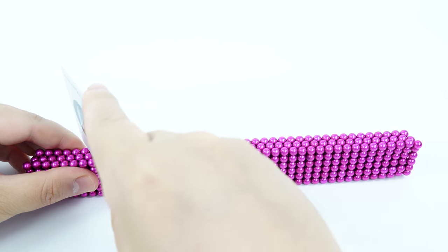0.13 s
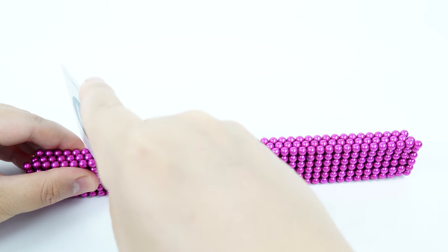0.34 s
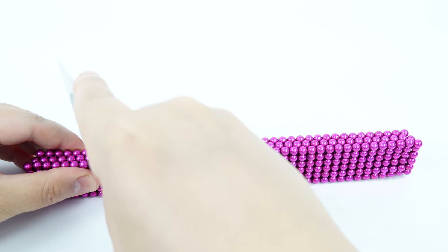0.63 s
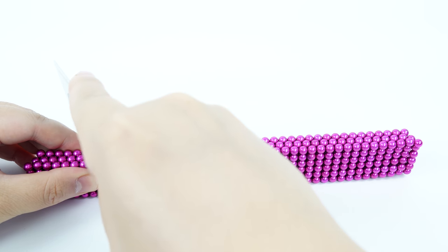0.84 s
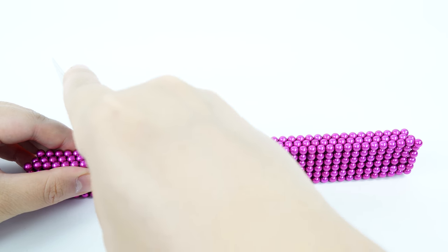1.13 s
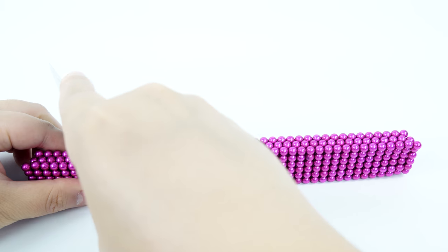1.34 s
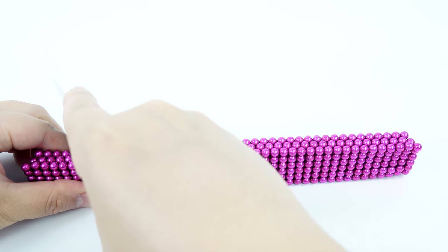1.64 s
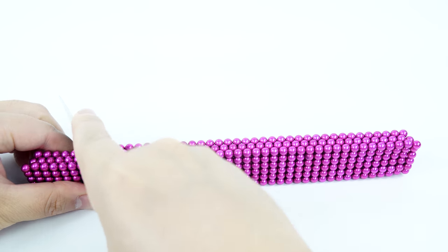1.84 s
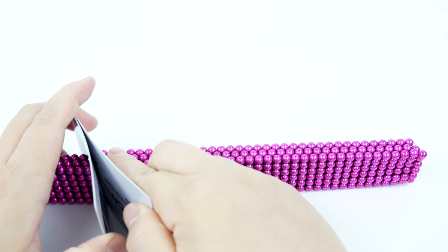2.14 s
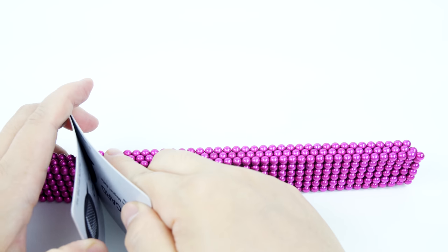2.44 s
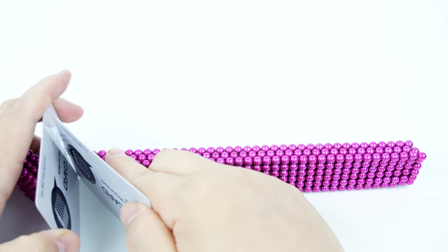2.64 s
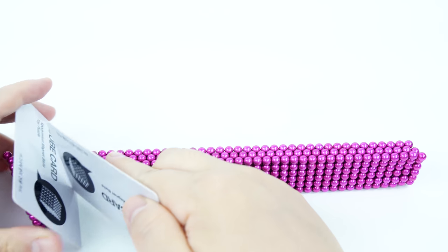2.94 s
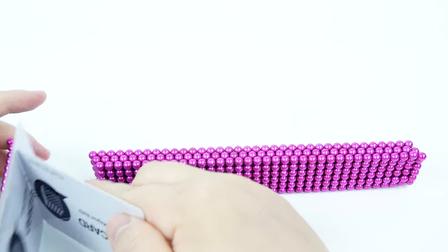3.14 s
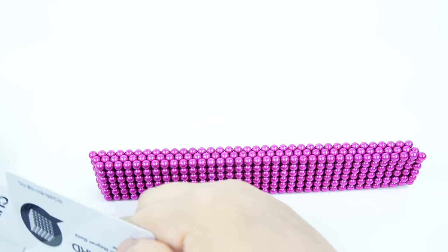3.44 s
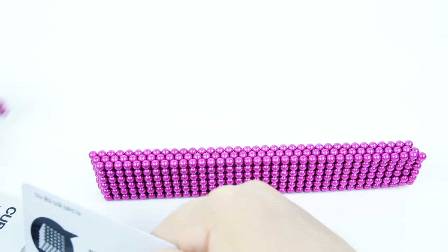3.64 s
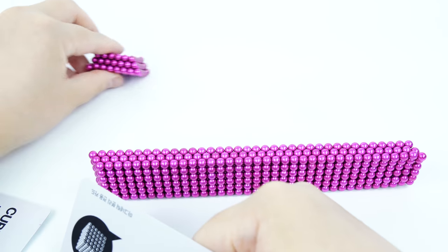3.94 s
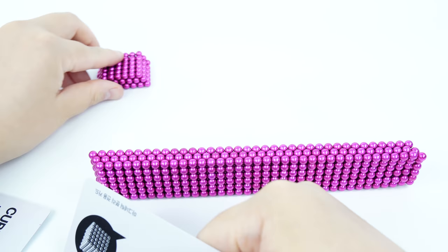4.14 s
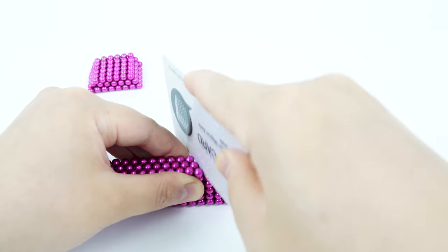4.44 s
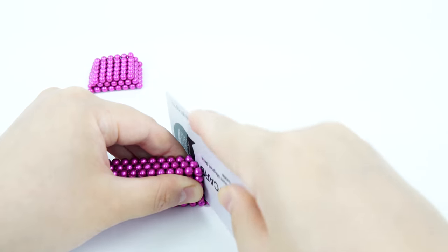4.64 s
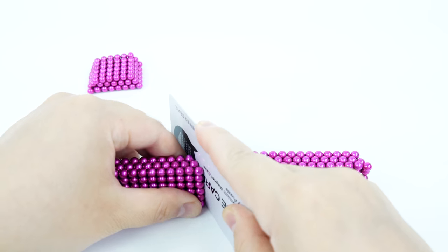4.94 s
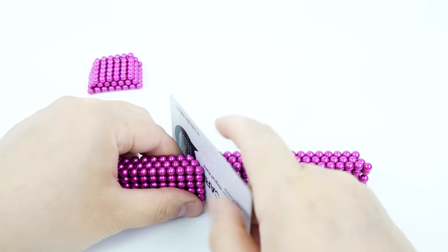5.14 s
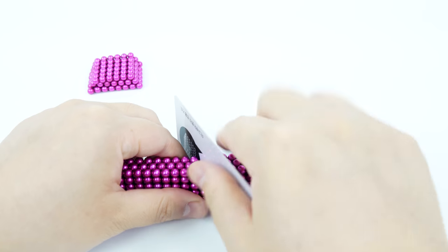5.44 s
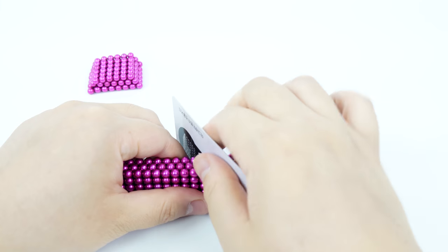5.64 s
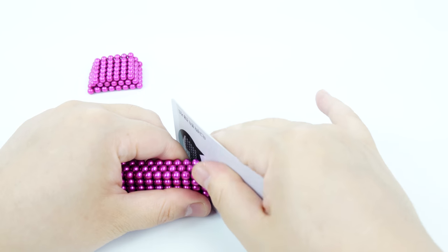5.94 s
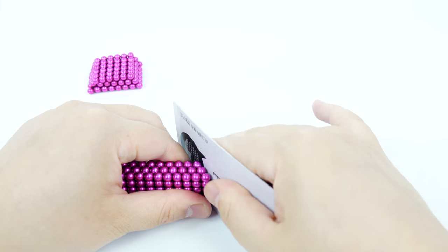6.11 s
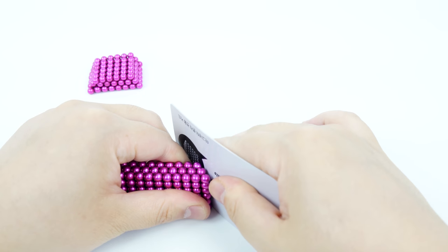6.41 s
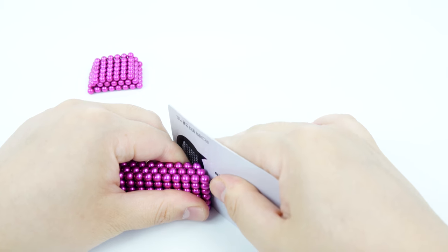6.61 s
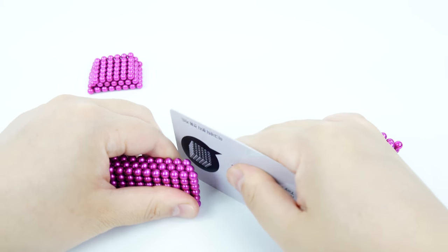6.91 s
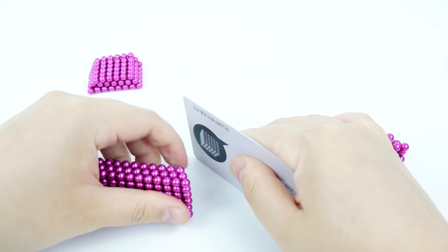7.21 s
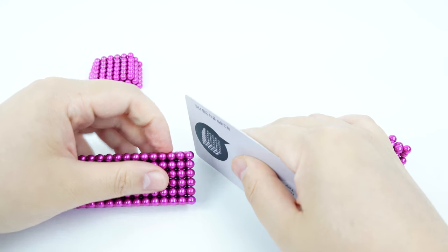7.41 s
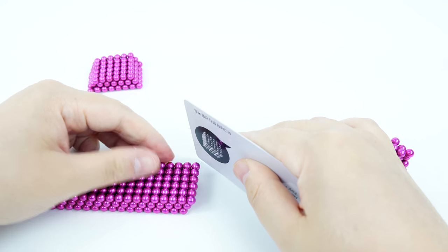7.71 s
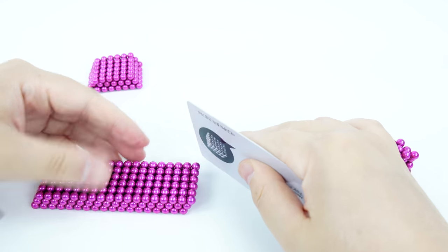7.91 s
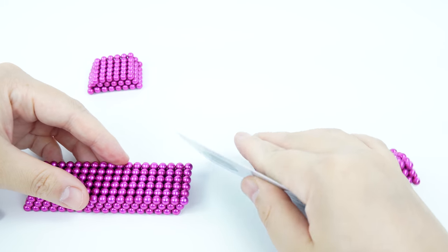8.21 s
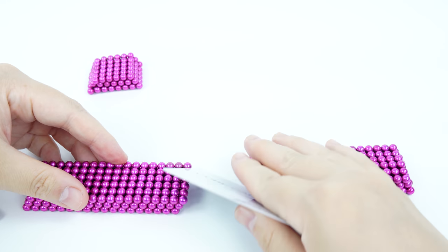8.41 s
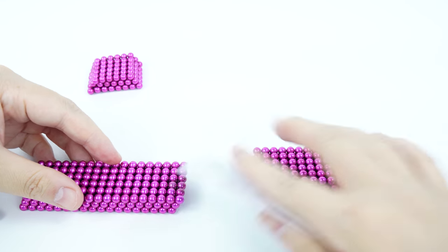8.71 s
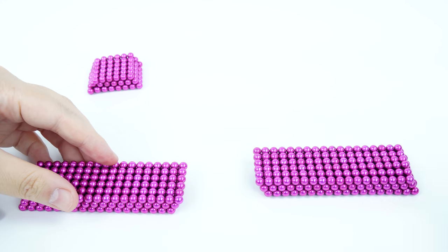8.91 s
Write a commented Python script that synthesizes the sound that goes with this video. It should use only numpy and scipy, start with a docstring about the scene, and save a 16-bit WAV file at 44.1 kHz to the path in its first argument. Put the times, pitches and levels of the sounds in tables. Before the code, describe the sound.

Small magnetic balls snap together in sharp clicks that knock a table, with soft rattling and a plastic card rustling between them.

```python
"""Small dry room, hollow table top: a slab of steel magnet balls is split with a plastic card and moved.
Balls snap together in short volleys of clicks that knock the table. Shoved by hand, the slab rattles
and rumbles over the wood; the card rustles over the balls and creaks between them.
Moving hands push air. Low ventilation hum and a faint hiss underneath."""
import sys
import numpy as np
from scipy import signal
from scipy.fft import rfft, irfft, next_fast_len
from scipy.io import wavfile

SR = 44100
rng = np.random.default_rng(int(sys.argv[2]) if len(sys.argv) > 2 else 0)


def master_out(mix):
    """Clip the mix to full scale and print it as 16-bit PCM to the path in sys.argv[1]."""
    frames = np.transpose(np.atleast_2d(mix))
    ceiling = np.clip(frames, -1, 1)
    pcm = np.round(ceiling * 32767).astype(np.int16)
    wavfile.write(sys.argv[1], SR, pcm)


N = 399546
CONTROL_HOP = 32  # samples

# table top modes, first two thump, the rest knock: freq_hz, level_db, t60_s
TABLE_MODES = [(54.6, -17, .15), (116, -1, 0.16), (221, -4.5, 0.081), (267.6, 0, 0.076), (330, -4, 0.048),
               (407, -2.5, 0.065), (464.3, -7, 0.11), (605, -1, 0.075), (681, -8.5, 0.17)]


def amp(db):
    """dB to gain."""
    return 10 ** (np.asarray(db) / 20)


def unit(x):
    """Scale to rms 1."""
    return x / np.sqrt(np.mean(x ** 2) + 1e-20)


def max_abs(x):
    """Peak magnitude."""
    return np.abs(x).max()


def along(points, hz):
    """Interpolate (freq_hz, value) points on a log axis."""
    f, v = np.transpose(points)
    return np.interp(np.log(hz + 1), np.log(f + 1), v)


def filtered(x, response):
    """Apply a complex frequency response."""
    m = next_fast_len(len(x) + SR // 4)
    return irfft(rfft(x, m) * response(np.fft.rfftfreq(m, 1 / SR)), m)[:len(x)]


def peak(f, hz, width_hz):
    """Causal resonance, gain 1 at centre."""
    return 1j * f * width_hz / (hz * hz - f * f + 1j * f * width_hz)


def grit(per_s, spread_db):
    """Random contacts: sparse impulses of scattered size."""
    size = amp(spread_db * rng.exponential(size=N)) * rng.standard_normal(N)
    return size * (rng.random(N) < per_s / SR)


def swells(rows):
    """Gain curve per row: rounded rise, even decay; rise_s and fall_s each span 20 dB."""
    top_s, db, rise_s, fall_s = np.transpose(rows)[:4, :, None]
    late_s = np.arange(0, N, CONTROL_HOP) / SR - top_s
    drop_db = 20 * np.where(late_s < 0, (late_s / rise_s) ** 2, late_s / fall_s)
    return amp(db - np.minimum(drop_db, 180))


def per_sample(control):
    """Control rate to sample rate."""
    return np.interp(np.arange(N), CONTROL_HOP * np.arange(len(control)), control)


def envelope(rows):
    """Power sum of the swells."""
    return per_sample(np.linalg.norm(swells(rows), axis=0))


def gripped(x, rows, bands, log_span):
    """Swelling ring of the bands the grip leaves free: those near the power-weighted mean pitch of the swells."""
    power = swells(rows) ** 2
    pitch_hz = per_sample(np.exp(np.log(np.transpose(rows)[4]) @ power / power.sum(0)))
    gains = [0.056 + np.exp(-(np.log(pitch_hz / hz) / log_span) ** 2) for hz, _ in bands]
    ring = 0
    for gain, (hz, width_hz) in zip(gains, bands):
        band = lambda f: peak(f, hz, width_hz) * peak(f, hz, 3 * width_hz)
        ring += gain * unit(filtered(x, lambda f: band(f) / (1 + 1j * f / (1.8 * hz)) ** 2))
    return envelope(rows) * ring / np.linalg.norm(gains, axis=0)


def room(x, wet_db):
    """Direct sound plus a diffuse tail with frequency-dependent decay."""
    decay = [(100, 0.32), (500, 0.21), (2000, 0.24), (6000, 0.19), (10000, .14), (14000, 0.15)]  # freq_hz, t60_s
    hz, t, spectrum = signal.stft(rng.standard_normal(SR // 3), SR, nperseg=256)
    tail = signal.istft(spectrum * amp(-60 * t / along(decay, hz)[:, None]), SR, nperseg=256)[1]
    tail = np.pad(tail / np.linalg.norm(tail), (round(.002 * SR), 0))  # nearest surface under 1 m
    return x + amp(wet_db) * signal.fftconvolve(x, tail)[:len(x)]


def ventilation():
    """Steady low hum of shaped noise."""
    spectrum = [(21, -38.5), (35, -4), (43, -9.5), (123, 0), (190, -12.5), (216, -11), (294, -7.5),
                (410, -13), (478, -15), (819, -21.5), (1090, -25), (2590, -39.5), (16000, -63.5)]  # freq_hz, level_db
    return amp(-59) * unit(filtered(rng.standard_normal(N), lambda f: amp(along(spectrum, f))))


def hiss():
    """Faint hiss: jumps to each new level, then mostly fades; the loud segment at 7.67 s is a bright rattle of
    balls settling."""
    segments = [(0.0, -68.5, 28), (1.337, -71, 20), (2.07, -69.5, 18), (2.89, -76.5, 6.5), (3.361, -66, 28),
                (4.376, -74.5, 6.5), (4.54, -57, 51), (4.96, -87, 4.5), (7.67, -47.5, 121.5),
                (8.0, -90.5, -4), (8.69, -73.5, 2)]  # start_s, level_db, fade_db_per_s
    spectrum = [(1000, -11.5), (3500, -3), (6500, -4), (9500, -4.5), (12500, -8), (16000, -5)]  # freq_hz, level_db
    t, columns = np.arange(N) / SR, np.transpose(segments)
    start_s, db, fade_db_per_s = columns[:, np.maximum(np.searchsorted(columns[0], t) - 1, 0)]
    noise = unit(filtered(rng.standard_normal(N), lambda f: amp(along(spectrum, f))))
    return amp(db - fade_db_per_s * (t - start_s)) * noise


def steel_clicks(volley, hz, clack_db, edge_db):
    """Ball contacts: a click, a duller clack of the slab, a bright edge."""
    width_hz = 0.52 * hz
    click = lambda f: peak(f, hz, width_hz) * peak(f, hz, 2.7 * width_hz) / (1 + 1j * f / (4.1 * hz)) ** 2
    clack = lambda f: peak(f, 1050, 730) * peak(f, 940, 1400)
    edge = lambda f: peak(f, 7200, 5000) ** 2
    # walls blur the volley into one blow of equal energy
    impulse = np.linalg.norm(volley) * signal.unit_impulse(len(volley))
    parts = [(amp(db) / max_abs(filtered(impulse, colour)), colour)
             for db, colour in [(0, click), (clack_db, clack), (edge_db, edge)]]
    steel = lambda f: sum(gain * colour(f) for gain, colour in parts)
    blow = filtered(impulse, steel)
    reflections = room(blow, wet_db=3.5) - blow
    return 1.9 * filtered(volley, steel) + reflections


def table_response(f, modes):
    """Table top modes, width set by decay; the treble falls away steeply above 900 Hz."""
    ring = sum((-1) ** k * amp(db) * peak(f, hz, np.log(1000) / np.pi / t60_s)
               for k, (hz, db, t60_s) in enumerate(modes))
    return ring / (1 + 1j * f / 900) ** 3


def table_blow(push, landing, knock_db, thump_db):
    """Knock, deep thump and a short, broad wooden slap near 480 Hz as the slab lands."""
    knock = filtered(push, lambda f: table_response(f, TABLE_MODES[2:]))
    thump = filtered(push, lambda f: table_response(f, TABLE_MODES[:2]))
    slap = filtered(np.roll(push, landing), lambda f: peak(f, 480, 690) ** 2)
    wood = amp(knock_db) * (knock / max_abs(knock) + 1.1 * slap / max_abs(slap))
    return room(wood, wet_db=-5.5) + amp(thump_db) * thump / max_abs(thump)


def snaps():
    """Loose balls tick, the slab snaps shut or lands: contact volleys ring steel and table."""
    ticks = [(0.027, -50.5, 4940), (.59, -74, 4200), (2.317, -62.5, 4210), (2.5452, -45, 5470),
             (2.72, -64, 3500), (2.829, -57.5, 3200), (3.245, -34, 5140), (3.683, -56, 5500),
             (5.0384, -57.5, 6200), (8.413, -55, 2124), (8.4925, -50.5, 6470), (8.574, -38.5, 5450),
             (8.686, -31, 5240)]  # start_s, level_db, pitch_hz
    tick_shape = (-19.5, -24, -17, -16.5, .0015)  # clack_db, edge_db, knock_db, thump_db, volley_s
    # start_s, level_db, pitch_hz, then as tick_shape; clack to thump relative to the click
    slab_snaps = [(1.4199, -60.5, 1680, -16, -25, 2, 28.5, 0.0022),
                  (1.4331, -42.5, 2800, 12.5, 2, 9.5, 14.5, 0.0012),
                  (1.4674, -40.5, 2610, -22, 0, 0.5, 13, 0.0012),
                  (1.7934, -23.5, 2614, -9, -10.5, -9, 2, 0.0011),
                  (1.8054, -26.5, 2340, -4.5, -18.5, -7, 2.5, 0.0027),
                  (1.8101, -8.5, 5000, -15, -18, -12, -18, 0.001),
                  (1.8111, -18.5, 1900, -13.5, -29, -15.5, -18, 0.001),
                  (1.9217, -48.5, 2630, -5.5, 6, 13, 23, 0.00074),
                  (2.628, -45, 1900, -17.5, -22.5, 8, -1.5, 0.0022),
                  (3.168, -35.5, 1900, 1, -11, -7, -32, 0.0015),
                  (3.2088, -36, 2260, 1.5, 2, 1, -20, 0.0015),
                  (3.5587, -26, 5270, -23.5, -4, -37, -19, 0.0026),
                  (3.599, -45.5, 2140, -10, 8, -6, 1.5, 0.0016),
                  (3.9874, -17.5, 1810, 0, -23, -4.5, -19.5, 0.0008),
                  (4.1812, -7.5, 2340, -7.5, -28, -4.5, -12, 0.0012),
                  (4.5334, -44, 2150, 0.5, -19, 18, 12.5, 0.0018),
                  (4.5408, -40.5, 1710, 4.5, -24.5, 19, 14.5, 0.0017),
                  (4.5703, -25, 1800, -8.5, -18.5, 10, -6, 0.0021),
                  (4.579, -14, 3086, -21, -31.5, -4, -2, 0.0043),
                  (4.709, -33.5, 1630, -7, -33.5, -14.5, 0.5, 0.0028),
                  (4.7943, -15, 1833, -23.5, -21, -23.5, -10, 0.0028),
                  (5.2397, -68.5, 1610, 13.5, -28, 16.5, 20, 0.00099),
                  (6.3997, -62, 1680, 4.5, -23, 16, 1, 0.0018),
                  (7.6529, -14.5, 2108, -4.5, -17.5, -3, -7, 0.0013),
                  (7.661, -3, 2900, -5.5, -26.5, -7, -13, 0.00092),
                  (7.673, -9.5, 1600, -8.5, -29, -24.5, -3.5, 0.0026)]
    out, t = np.zeros(N + SR), np.arange(SR // 2) / SR
    events = slab_snaps + [tick + tick_shape for tick in ticks]
    for start_s, db, hz, clack_db, edge_db, knock_db, thump_db, volley_s in events:
        swell = (.4 + t / 0.00051) * np.exp(-t / volley_s)
        volley = rng.standard_normal(len(t)) * (rng.random(len(t)) < .15) * swell
        landing = round(volley_s * SR)
        volley[0] = -2.7  # clear first contact
        volley[landing] = -3.0  # most balls land together
        push = -np.exp(-t / 0.00027) + 0.2 * volley  # softer, longer force on the table
        steel = steel_clicks(volley, hz, clack_db, edge_db)
        wood = table_blow(push, landing, knock_db, thump_db)
        out[round(start_s * SR):][:len(t)] += amp(db) * (steel + wood)
    return out[:N]


def hand_air():
    """Moving hands push air at the microphone."""
    puffs = [(1.46, -54.5, .03, .08), (1.83, -41, .03, .08), (3.39, -36.5, .13, .09),
             (3.613, -45.5, .05, .08), (4.19, -40, .02, .1)]  # top_s, level_db, rise_s, fall_s
    return envelope(puffs) * unit(filtered(rng.standard_normal(N), lambda f: peak(f, 35, 31) ** 2))


def slab_rattle(bumps):
    """Balls jostle within the slab."""
    jostles = [(2.625, -48, 0.025, 0.079, 1150), (3.01, -70.5, 0.025, 0.071, 1414),
               (3.12, -59, 0.041, 0.13, 1450), (3.172, -44, 0.0055, 0.19, 2060),
               (3.585, -52.5, 0.047, 0.085, 2230), (4.039, -49, 0.024, 0.038, 1608),
               (4.165, -60, 0.0093, 0.031, 1350), (4.25, -50.5, .03, 0.11, 2410),
               (4.581, -27, 0.026, .04, 1218), (4.806, -28.5, 0.018, 0.045, 2130),
               (6.832, -34, 0.034, 0.084, 1435), (8.021, -65, 0.079, .12, 1350),
               (8.16, -62.5, 0.086, 0.064, 1370), (8.429, -67, 0.031, 0.18, 2040)]  # top_s, level_db, rise_s, fall_s, pitch_hz
    slab_bands = [(1120, 170), (1450, 780), (1750, 490), (2150, 470), (2900, 240)]  # freq_hz, width_hz
    return gripped(bumps, jostles, slab_bands, log_span=0.25)


def card_rustle(bumps):
    """The card slides over the balls: bumps plus fine friction."""
    rubs = [(2.624, -64.5, 0.023, 0.085), (3.11, -75, 0.07, 0.066), (3.198, -44.5, 0.018, 0.074),
            (3.529, -60.5, 0.23, .15), (4.165, -73, 0.012, 0.014), (4.545, -53.5, .01, .02),
            (4.603, -53, 0.024, 0.065), (6.83, -50, 0.033, 0.085), (8.501, -78, 0.16, 0.1),
            (8.8, -72, 0.055, .8), (9.0, -68, 0.17, .06)]  # top_s, level_db, rise_s, fall_s
    spectrum = [(2000, -26), (4400, -10.5), (5200, -4.5), (6500, -5.5), (7200, -3), (8000, -11),
                (9600, -16.5), (10400, -15.5), (16000, -32)]  # freq_hz, level_db
    friction = .4 * bumps + grit(per_s=7000, spread_db=.8)
    return envelope(rubs) * unit(filtered(friction, lambda f: amp(along(spectrum, f))))


def slab_rumble():
    """The slab bumps over the table ball by ball; the hand damps the wood slightly."""
    shoves = [(2.698, -36.5, 0.066, 0.067, 242), (3.197, -35.5, 0.031, 0.18, 238),
              (3.353, -32.5, 0.063, 0.09, 254), (3.606, -38, 0.083, 0.038, 225),
              (4.05, -33.5, 0.034, 0.087, 322), (4.165, -32, 0.045, 0.036, 323),
              (4.25, -37, 0.081, 0.084, 325), (4.308, -31.5, 0.018, 0.057, 300),
              (4.585, -23, 0.037, 0.035, 330), (6.864, -21.5, 0.052, 0.09, 334),
              (7.36, -43, 0.057, 0.091, 226.7), (7.99, -57.5, 0.067, 0.084, 318),
              (8.16, -52.5, 0.073, 0.087, 607), (8.29, -36, 0.066, 0.12, 299)]  # top_s, level_db, rise_s, fall_s, pitch_hz
    wood_bands = [(hz, 1.11 * np.log(1000) / np.pi / t60_s) for hz, _, t60_s in TABLE_MODES[2:]]
    return gripped(grit(per_s=610, spread_db=-4.0), shoves, wood_bands, log_span=0.37)


def card_creaks():
    """The bent card slips sharply between balls; finer slips sustain one narrow resonance."""
    creaks = [(5.174, -62, 1365, 0.011), (5.191, -56, 1378, 0.012), (5.238, -58.5, 1590, 0.017),
              (6.284, -51, 2850, 0.023), (6.318, -50.5, 2890, 0.018), (6.338, -54.5, 2640, 0.016),
              (6.401, -73, 2900, 0.014), (6.414, -55.5, 1453, 0.031), (6.4436, -52, 1696, 0.022),
              (6.441, -55.5, 2800, 0.036), (6.471, -57.5, 1670, 0.02), (6.501, -62, 1640, 0.018),
              (6.5844, -69, 1540, 0.025)]  # start_s, level_db, pitch_hz, decay_s
    out, t = np.zeros(N + SR), np.arange(SR // 2) / SR
    for start_s, db, hz, decay_s in creaks:
        slips = rng.standard_normal(len(t)) * (rng.random(len(t)) < .03) * np.exp(-t / decay_s)
        slips[0] = 2.46
        ring = filtered(slips, lambda f: peak(f, hz, 0.16 * hz) * peak(f, hz, 0.57 * hz))
        ring += filtered(0.12 * slips[0] * (t == 0), lambda f: peak(f, 5430, 3300) ** 2)  # bright tick
        out[round(start_s * SR):][:len(t)] += amp(db) * room(ring / max_abs(ring), wet_db=-6)
    return out[:N]


def scene():
    """Mono mix; rattle and rustle share the same bumps."""
    contacts = snaps() + card_creaks()
    bumps = grit(per_s=1800, spread_db=-0.5)
    drag = slab_rumble() + room(slab_rattle(bumps) + card_rustle(bumps), wet_db=-9.0)
    return (contacts + drag + hand_air() + hiss() + ventilation())[None]


def record(dry):
    """Microphone with soft treble, low cut, soft peak clipping and band limit."""
    mic_response = [(1000, -0.5), (9000, -3), (12000, -3.5), (16000, -14)]  # freq_hz, gain_db
    low_cut_hz, top_hz = 8.3, 16000
    x = filtered(dry[0], lambda f: amp(along(mic_response, f)) * 1j * f / (low_cut_hz + 1j * f))
    x = x / (1 + np.abs(x) ** 6) ** (1 / 6)
    return filtered(x, lambda f: f < top_hz)[None]


dry = scene()
out = record(dry)
master_out(out)
```